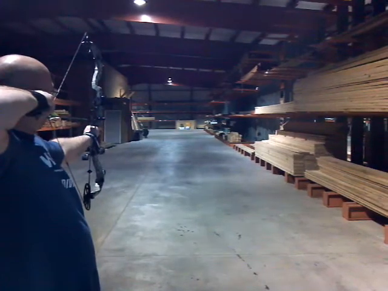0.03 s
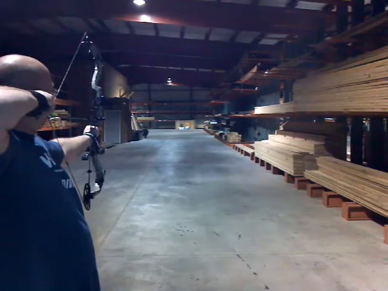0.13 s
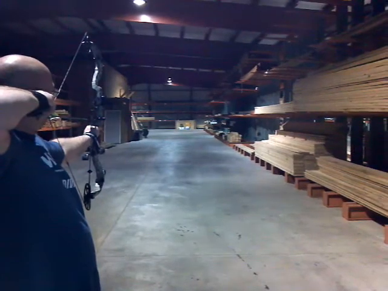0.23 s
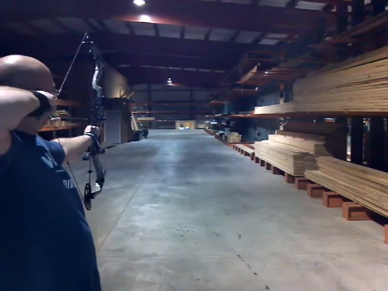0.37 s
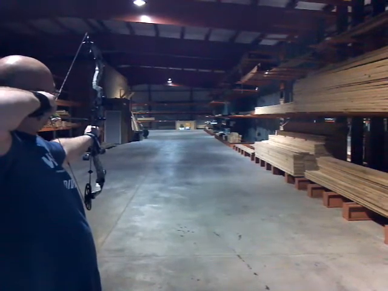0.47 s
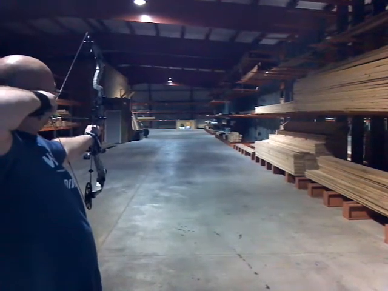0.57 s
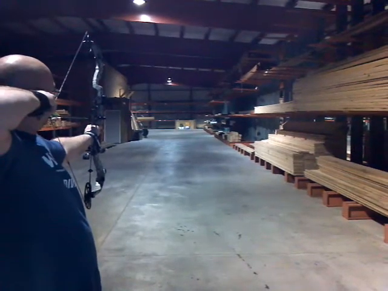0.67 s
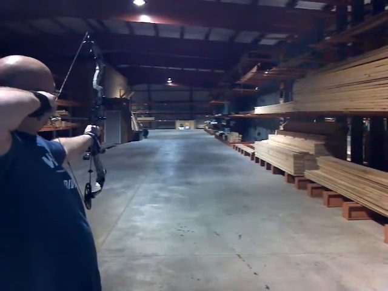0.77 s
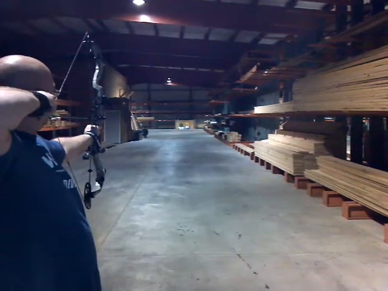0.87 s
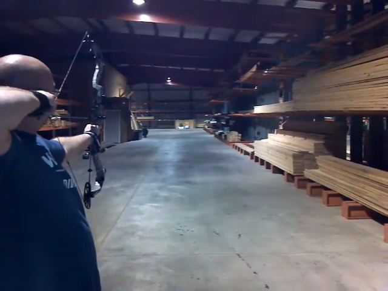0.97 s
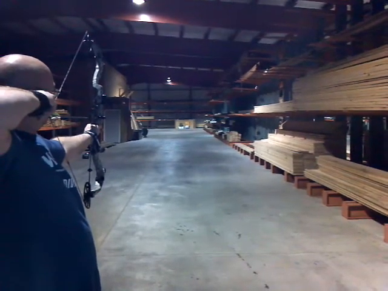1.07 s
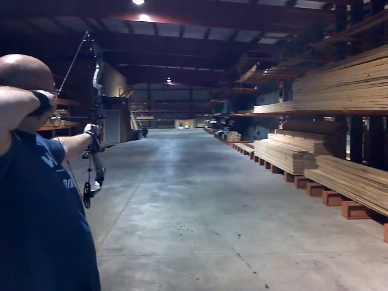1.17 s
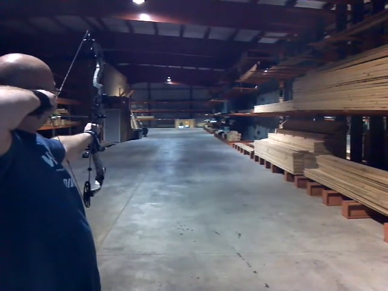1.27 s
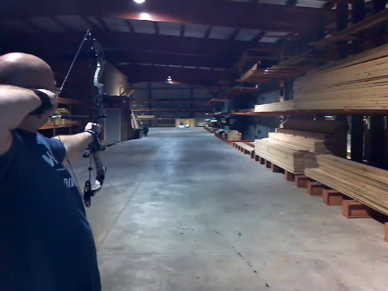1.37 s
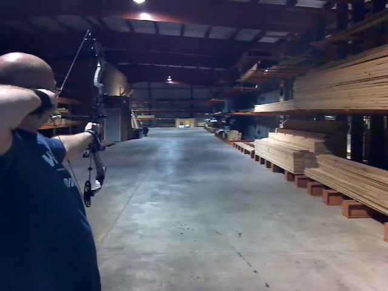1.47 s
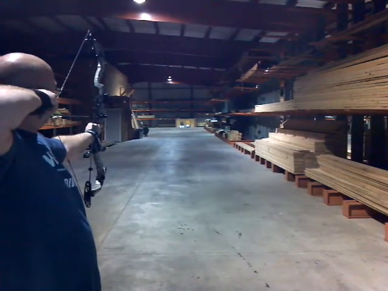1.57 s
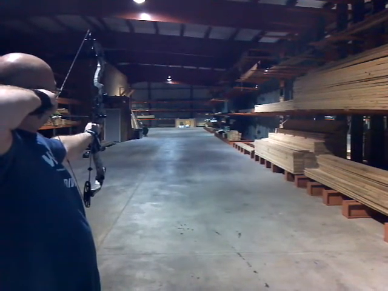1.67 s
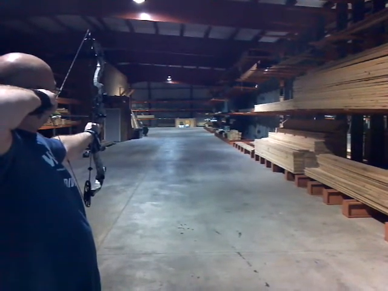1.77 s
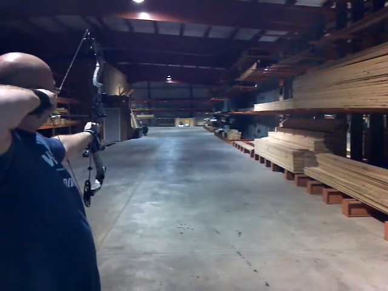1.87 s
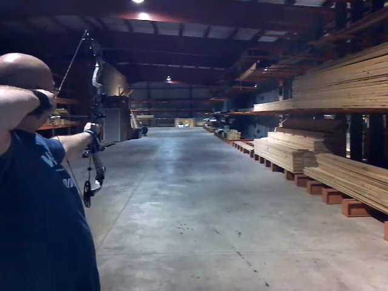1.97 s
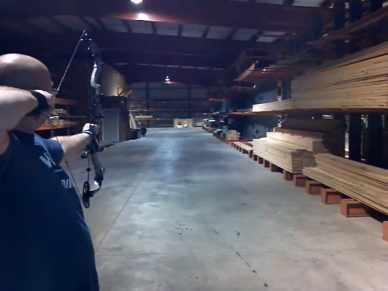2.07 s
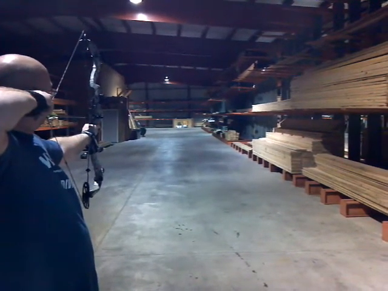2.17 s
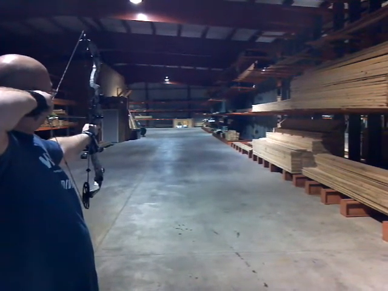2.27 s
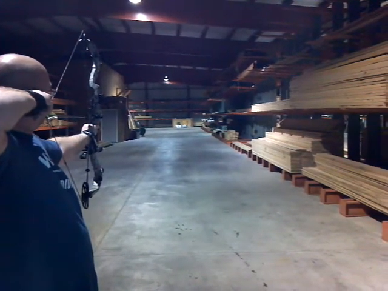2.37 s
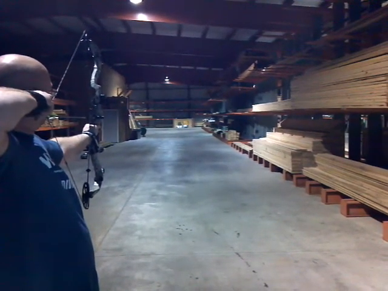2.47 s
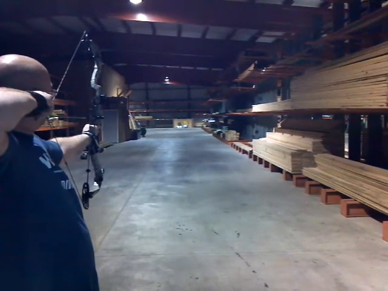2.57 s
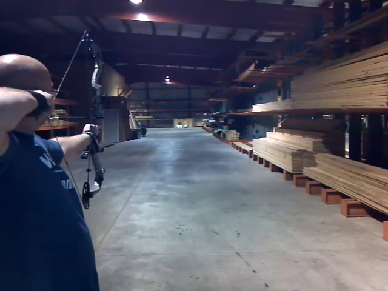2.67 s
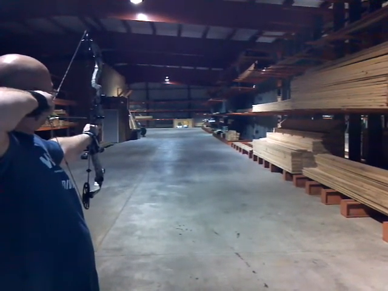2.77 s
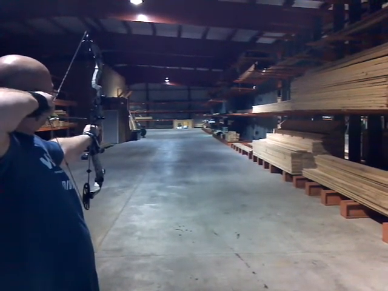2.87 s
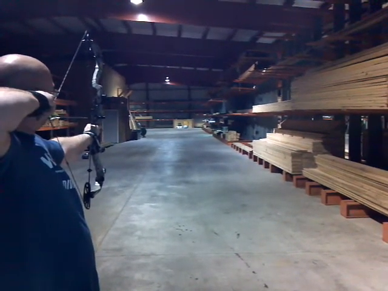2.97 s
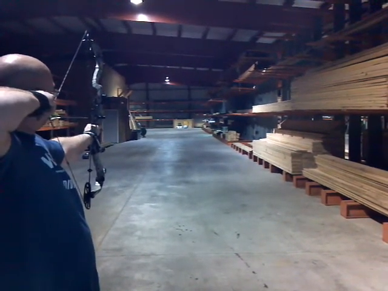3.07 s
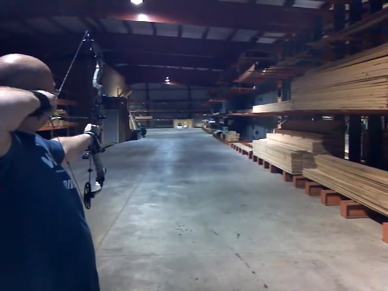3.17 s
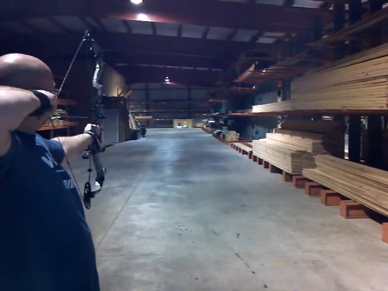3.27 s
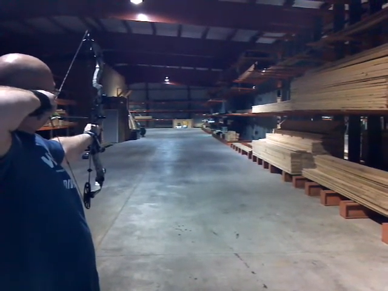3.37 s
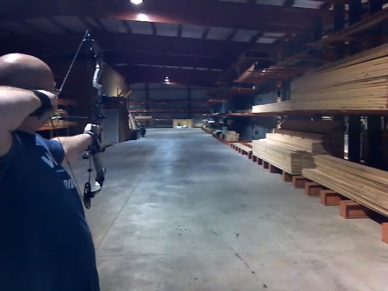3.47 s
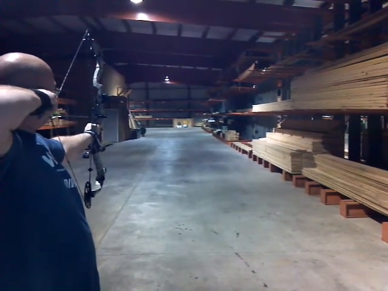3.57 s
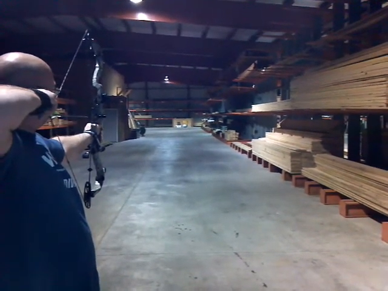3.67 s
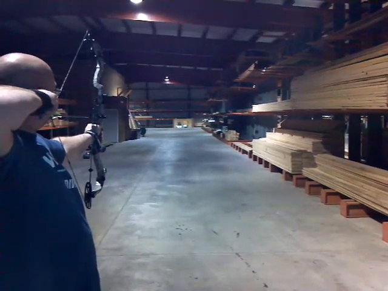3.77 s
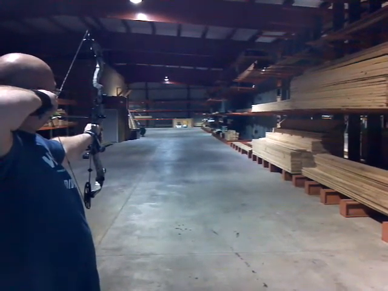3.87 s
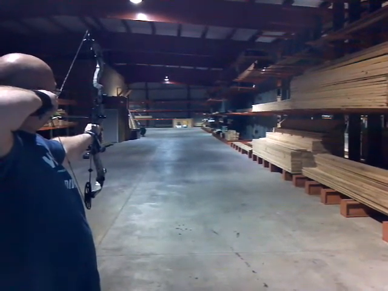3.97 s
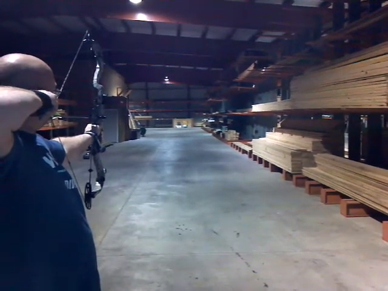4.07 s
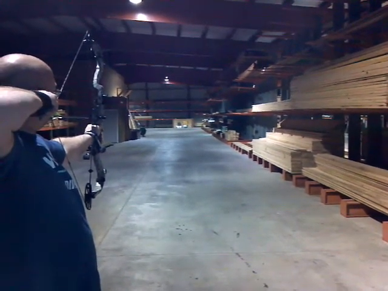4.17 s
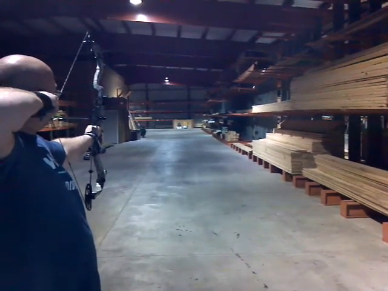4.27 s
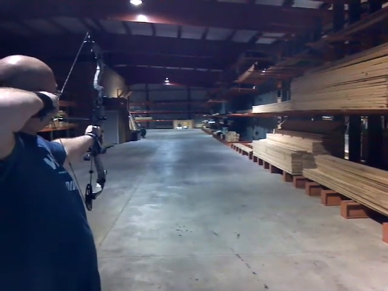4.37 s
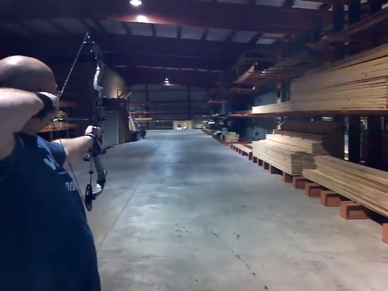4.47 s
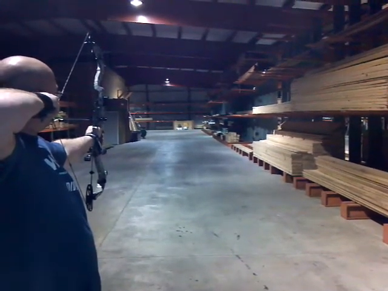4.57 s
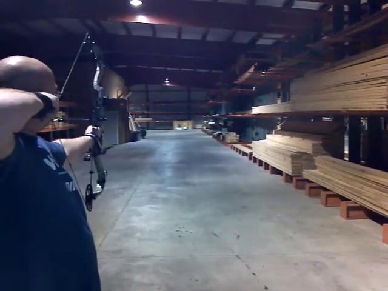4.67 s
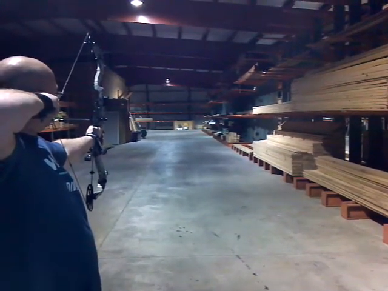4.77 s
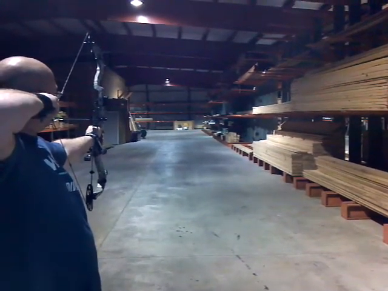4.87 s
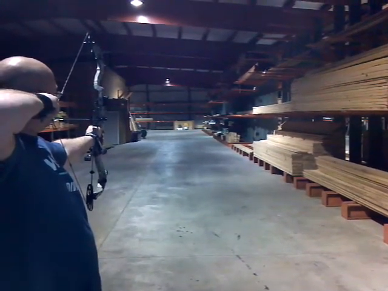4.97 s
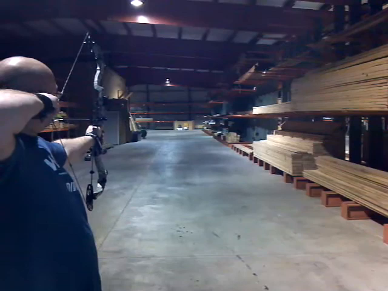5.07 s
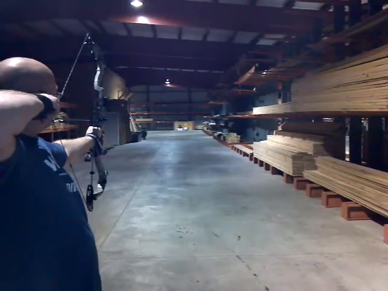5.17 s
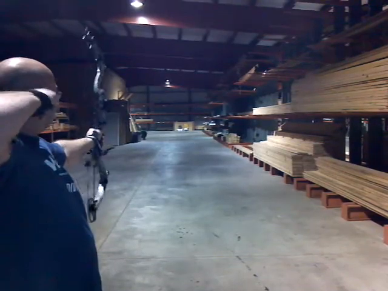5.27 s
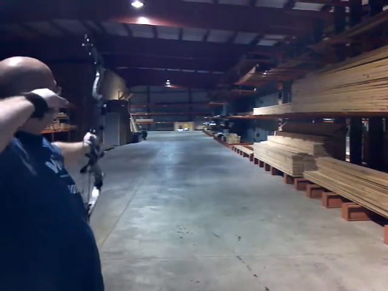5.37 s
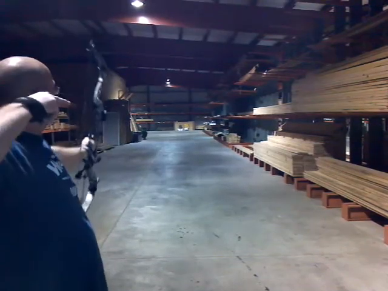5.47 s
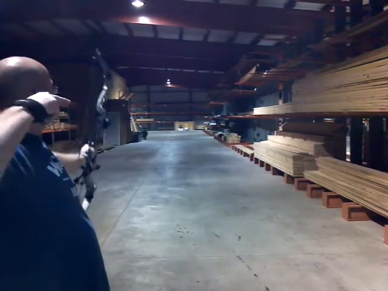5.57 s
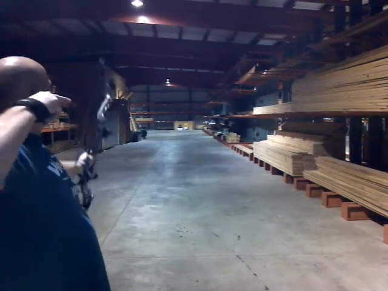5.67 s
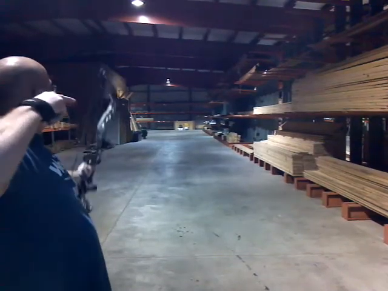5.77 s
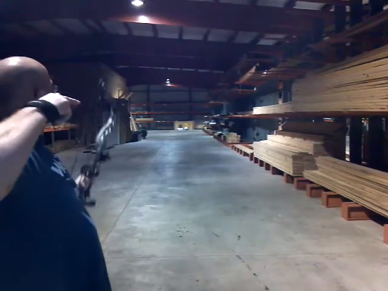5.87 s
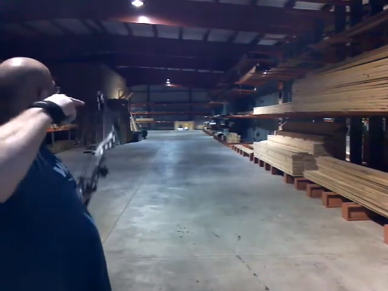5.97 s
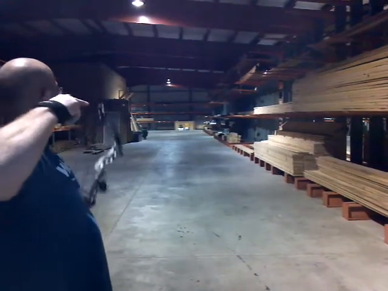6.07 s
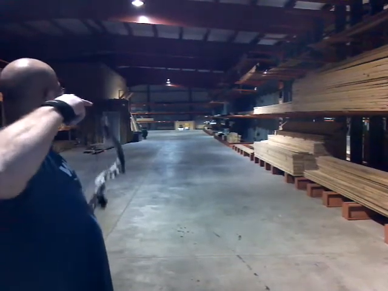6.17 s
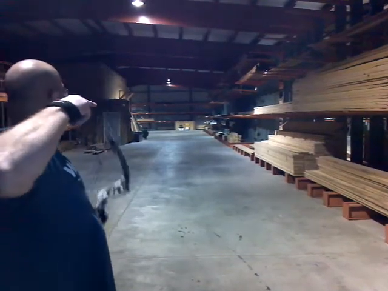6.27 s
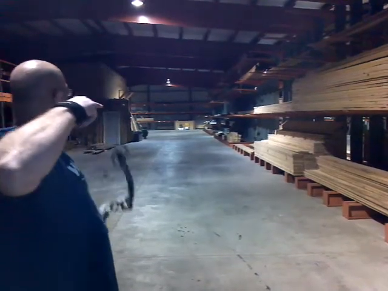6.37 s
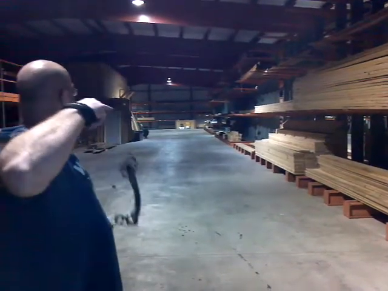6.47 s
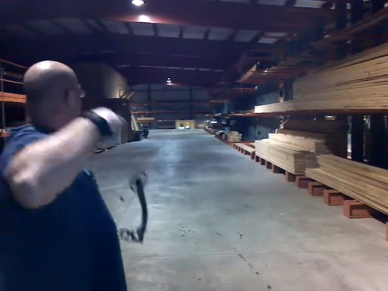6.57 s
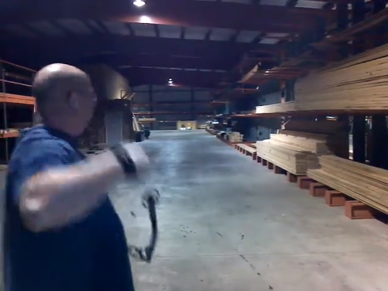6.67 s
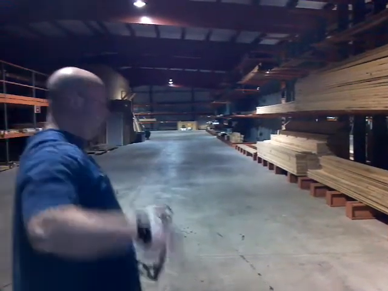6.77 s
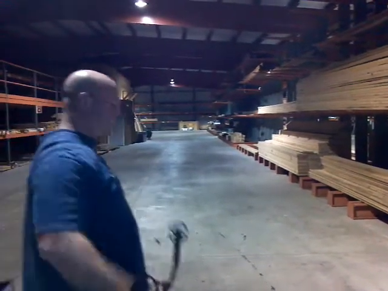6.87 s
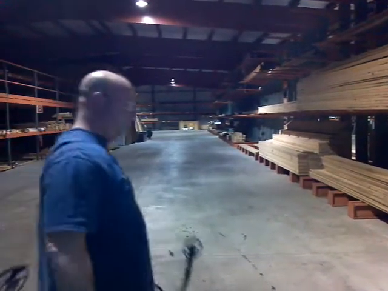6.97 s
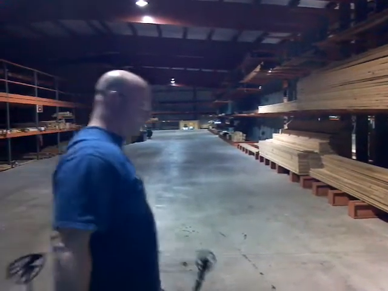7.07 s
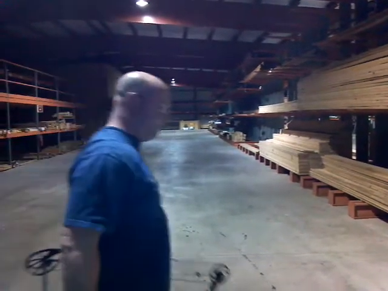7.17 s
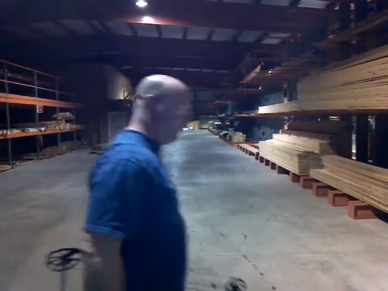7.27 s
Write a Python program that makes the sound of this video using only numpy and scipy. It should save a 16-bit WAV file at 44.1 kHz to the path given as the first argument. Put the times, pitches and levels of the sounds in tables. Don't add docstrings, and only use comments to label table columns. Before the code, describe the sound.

Quiet lamp hum and hiss, then a trigger click and hard bowstring crack; under a second later an arrow thuds far away, both echoing.

```python
import sys
import numpy as np
from scipy import signal
from scipy.fft import rfft, irfft
from scipy.io import wavfile
from scipy.ndimage import uniform_filter1d

SR = 44100
rng = np.random.default_rng(int(sys.argv[2]) if len(sys.argv) > 2 else 0)


def output_pcm(signal):
    pcm = np.clip(np.atleast_2d(signal).T, -1, 1) * 32767
    wavfile.write(sys.argv[1], SR, np.round(pcm).astype(np.int16))


def level_to_linear(level):
    exponent = np.asarray(level, float) / 20
    return 10 ** exponent


N = 322582

# frequency in Hz, side minus mid level in dB.
SPREAD = [(40, -32), (80, -26), (170, -22.5), (330, -12.5), (670, -5), (1300, -3), (2000, 1), (15000, 0)]


def read(points, hz):
    f, value = np.transpose(points)
    return np.interp(np.log(hz + 1), np.log(f + 1), value)


def add(mix, start_s, sound):
    part = mix[..., round(start_s * SR):][..., :sound.shape[-1]]
    part += sound[..., :part.shape[-1]]


def colour(points):
    log_gain = np.log(level_to_linear(read(points, abs(np.fft.fftfreq(4096, 1 / SR)))))
    minimum_phase = np.exp(np.conj(signal.hilbert(log_gain)))
    return np.fft.ifft(minimum_phase).real[:2048]


def ring(modes):
    t = np.arange(SR * 3 // 4) / SR
    sines = [level_to_linear(db - 60 * t / t60_s) * np.sin(2 * np.pi * hz * t) for hz, db, t60_s in modes]
    return sum(sines) / 2


def burst(length_s):
    t = np.arange(SR // 30) / SR
    attack = np.minimum(t / 0.00014, 1)
    shape = np.exp(-t / length_s) * attack
    puff = rng.standard_normal(len(t)) * shape
    return puff * np.linalg.norm(shape) / np.linalg.norm(puff)


def diffuse(field_db, spread, start_s=0, size=512, patchy_db=1.5):
    first = round(start_s * SR)
    hz, t, z = signal.stft(rng.standard_normal((2, N - first)), SR, nperseg=size)
    patches = uniform_filter1d(rng.standard_normal(z.shape[1:]), 5, 0)
    patches = uniform_filter1d(patches, 9, 1)
    level_db = field_db(hz[:, None], t + start_s) + patchy_db * patches / patches.std()
    z = z * level_to_linear(level_db) * np.sqrt(SR / 2)
    z[1] *= level_to_linear(read(spread, hz))[:, None]
    mid, side = signal.istft(z, SR, nperseg=size)[1][:, :N - first]
    return np.pad([mid + side, mid - side], ((0, 0), (first, 0)))


def arrive(x, late):
    hz = np.fft.rfftfreq(N, 1 / SR)
    delay = np.exp(-2j * np.pi * hz * read(late, hz) / SR)
    return np.array([x, irfft(rfft(x) * delay, N)])


def curve(t, top_s, rise_s, fall_s):
    return (t - top_s) / np.where(t < top_s, rise_s, fall_s)


def bow():
    # start in seconds, crack level in dB, blow into the limbs in dB, crack length in seconds.
    snaps = [
        (5.2718, -31, -60, 0.0024),
        (5.2744, -13, -56, 0.0014),
        (5.281, -28.5, -56, 0.005),
        (5.293, -28, -41, 0.0043),
        (5.337, -31, -28, .003),
    ]
    # frequency in Hz, level in dB.
    crack_colour = [(300, -21.5), (1000, -17.5), (2100, -10), (3400, -9), (4600, -15), (6800, -1),
                    (8500, -2), (10700, -11), (14200, -11), (16200, -28), (16800, -59)]
    # frequency in Hz, level in dB, t60 in seconds.
    limb_modes = [(170.6, -13, 0.12), (380, 4, 0.03), (702, -18, 0.037), (790, -5.5, 0.092),
                  (834, -5.5, 0.043), (940, -8, 0.032), (1120, -4.5, 0.04), (1255, -11, 0.077),
                  (3350, -3, 0.035), (3630, -11, 0.06), (5880, -8, .08), (6560, -7, 0.054)]
    # start in seconds, frequency in Hz, level in dB, t60 in seconds.
    riser_modes = [
        (5.2967, 362, -15.5, 0.22),
        (5.2965, 395, -18.5, 0.092),
    ]
    crack, blow = np.zeros((2, N))
    for start_s, crack_db, blow_db, length_s in sorted(snaps + string_slaps()):
        add(crack, start_s, level_to_linear(crack_db) * burst(length_s))
        add(blow, start_s, level_to_linear(blow_db) * signal.windows.hann(9) / 4)
    out = signal.oaconvolve(crack, colour(crack_colour))[:N]
    out += signal.oaconvolve(blow, ring(limb_modes))[:N]
    for start_s, *mode in riser_modes:
        swing = ring([mode])
        onset = np.minimum(np.arange(len(swing)) / SR / 0.0085, 1)
        add(out, start_s, 2 * swing * onset)
    return out


def string_slaps():
    slaps = 6
    k = np.arange(slaps)
    start_s = 5.2961 + 0.0042 * k + 0.00002 * k ** 3 * (k / slaps) ** 2
    crack_db = -4.5 - 3.3 * k
    blow_db = -17 - 0.8 * (k - 2.2) ** 2
    length_s = 0.0008 * 1.25 ** k
    return list(zip(start_s, crack_db, blow_db, length_s))


def target():
    # start in seconds, thump level in dB, slap level in dB, polarity.
    thumps = [
        (6.1422, -20, -23, 1),
        (6.1505, -30, -24, 1),
        (6.1533, -5, -34, -1),
        (6.1609, -19.5, -25, -1),
        (6.174, -20, -24, 1),
        (6.1859, -9.5, -27, -1),
        (6.194, -21, -33, -1),
        (6.208, -20, -30, -1),
        (6.284, -25, -55, -1),
    ]
    # frequency in Hz, level in dB,
    # t60 in seconds.
    bag_modes = [(167, -1, .09), (206, -8, 0.1), (298, 2.5, 0.06), (353, -5.5, 0.04), (737, -9, 0.043),
                 (720, -33, 1.3), (820, -9, .04), (1250, -22, 0.14), (1900, -15, .14)]
    # frequency in Hz, level in dB.
    slap_colour = [(300, -21.5), (800, 0.5), (2000, 3.5), (3500, -25), (6500, -7.5), (10000, -17),
                   (14500, -36), (15800, -60)]
    slap, blow = np.zeros((2, N))
    for start_s, thump_db, slap_db, polarity in thumps:
        add(slap, start_s, level_to_linear(slap_db) * burst(0.0046))
        add(blow, start_s, polarity * level_to_linear(thump_db) * signal.windows.hann(41) / 20)
    out = signal.oaconvolve(slap, colour(slap_colour))[:N]
    return out + signal.oaconvolve(blow, ring(bag_modes))[:N]


def ticks():
    # start in seconds, peak level in dB, frequency in Hz.
    clicks = [(5.5585, -32, 6200), (5.6114, -50, 6740), (5.6194, -49, 6120), (5.8097, -45, 6900),
              (6.4814, -53.5, 6910), (6.8237, -37, 6500), (6.8646, -36, 6610)]
    # start in seconds, peak level in dB, frequency in Hz.
    knocks = [
        (1.372, -62, 15600),
        (7.2148, -50, 3200),
    ]
    out, t = np.zeros(N), np.arange(400) / SR
    for start_s, peak_db, hz in clicks + knocks:
        metal = np.sin(2 * np.pi * hz * t) * np.exp(-t / 0.00025)
        puff = burst(0.0004)[:400]
        add(out, start_s, level_to_linear(peak_db - 7) * (np.convolve(metal, puff)[:400] + 0.8 * puff))
    return out


def end_walls(x):
    # delay in seconds, level in dB.
    bounces = [
        (0.3815, -20.5),
        (.764, -36.5),
    ]
    # frequency in Hz, level in dB.
    wall_colour = [(100, -12), (200, -9), (310, -3), (450, -5), (850, -14), (1200, -3), (2500, -8),
                   (6000, -45)]
    smear_s, centre = 0.016, 500
    scatter = 0.09 * rng.standard_normal(1500)
    scatter *= signal.windows.exponential(1500, centre, smear_s * SR, sym=False)
    scatter[centre] = 1
    dull = signal.oaconvolve(x, np.convolve(scatter, colour(wall_colour)))[centre:N + centre]
    out = np.zeros(N)
    for delay_s, db in bounces:
        add(out, delay_s, level_to_linear(db) * dull)
    return out


def hall(start_db, t60, start_s, fill_s, tail_db, early_db, early_s):
    def field_db(hz, t):
        return read(start_db, hz) - 60 * np.maximum(t - start_s, 0) / read(t60, hz)

    since_s = np.maximum(np.arange(N) / SR - start_s, 0)
    fill = np.minimum(since_s / fill_s, 1) ** 1.3
    level = level_to_linear(tail_db + early_db * np.exp(-since_s / early_s))
    return diffuse(field_db, SPREAD, start_s, patchy_db=0.5) * fill * level


def bow_tail():
    # frequency in Hz, level in dB per Hz.
    bow_hall = [(60, -71), (120, -59), (250, -69.5), (365, -53), (520, -70.5), (900, -77), (2500, -78.5),
                (5000, -79.5), (8000, -84.5), (10700, -92.5), (14500, -92), (16000, -99), (16500, -130)]
    # frequency in Hz, t60 in seconds.
    bow_t60 = [(100, 3), (350, 0.97), (1000, 1.17), (3000, 1.24), (6000, 1.0), (10000, 0.8), (15000, 0.55)]
    bow_fill = (5.294, .013, -2.5, 16, .055)
    return hall(bow_hall, bow_t60, *bow_fill)


def target_tail():
    # frequency in Hz, level in dB per Hz.
    target_hall = [(70, -72.5), (120, -36), (170, -46), (330, -59.5), (560, -80), (740, -69), (1300, -71),
                   (2100, -66.5), (3700, -72.5), (5100, -85), (7800, -89), (11000, -107), (15000, -112),
                   (16000, -130)]
    # frequency in Hz, t60 in seconds.
    target_t60 = [(100, 1.2), (350, 1.5), (1000, 1.1), (3300, 1.5), (6000, 1.05), (10000, 0.5), (15000, .3)]
    target_fill = (6.142, .032, 1.5, 4, .045)
    return hall(target_hall, target_t60, *target_fill)


def sleeve():
    # frequency in Hz, level in dB per Hz.
    cloth_colour = [(1000, -112), (2000, -110), (4200, -118), (6500, -107), (8200, -113), (10000, -120),
                    (13000, -118), (15100, -122), (15600, -160)]

    def field_db(hz, t):
        return read(cloth_colour, hz) + 3.5 - 6 * curve(t, top_s=7.08, rise_s=0.19, fall_s=0.15) ** 2

    return diffuse(field_db, SPREAD, start_s=6.75, patchy_db=2.5)


def passing_vehicle():
    # frequency in Hz, level in dB per Hz.
    passing_colour = [(90, -100), (140, -81.5), (220, -85.5), (330, -100), (500, -120), (1000, -160)]

    def field_db(hz, t):
        distance = curve(t, top_s=5.15, rise_s=0.3, fall_s=0.6)
        return read(passing_colour, hz) + 3 - 10 * np.log10(1 + distance ** 4)

    return diffuse(field_db, SPREAD, start_s=4, size=2048, patchy_db=0.5)


def tones(orders, base_hz, waver_db):
    t, out = np.arange(N) / SR, np.zeros(N)
    slow_t = t[::256]
    for order, db in orders:
        a, b, c, phase = rng.random(4)
        drift = np.sin(2 * np.pi * ((0.24 + 0.5 * a) * slow_t + b))
        drift += np.sin(2 * np.pi * (0.79 * slow_t * (1 + c) + a))
        level = np.interp(t, slow_t, level_to_linear(db + waver_db * drift))
        out += np.sqrt(2) * level * np.sin(2 * np.pi * (order * base_hz * t + phase))
    return out


def lamp_hum():
    # multiple of twice the mains, level in dB.
    lamp_orders = [(1, -61), (2, -72.5), (3, -82), (4, -89), (5, -83), (6, -88.5), (7, -92), (9, -97),
                   (10, -98.5), (11, -91), (12, -95), (33, -99), (50, -100), (51, -91.5), (52, -93.5),
                   (55, -90), (57, -89), (58, -103)]
    buzz = tones(lamp_orders, base_hz=120.05, waver_db=1.2)
    return arrive(buzz, [(1, -5)]) * level_to_linear([[-0.15], [0.15]])


def fan():
    # multiple of the blade rate, level in dB.
    fan_orders = [(1, -89), (2, -82), (3, -83.5), (4, -86.5), (5, -90), (10, -94.5)]
    return tones(fan_orders, base_hz=92.9, waver_db=0) * np.array([[0.7], [-1.3]])


def hall_air():
    # frequency in Hz, level in dB per Hz.
    air_colour = [(50, -97), (85, -87), (130, -76.5), (240, -88.5), (400, -98.5), (800, -111), (1500, -117),
                  (4000, -122), (9000, -140)]

    def field_db(hz, t):
        rise_db = 5 / (1 + np.exp((5.3 - t) / 0.3))
        return read(air_colour, hz) - 6 + rise_db

    return diffuse(field_db, SPREAD, size=2048, patchy_db=1.3)


def capsule_hiss():
    # frequency in Hz, level in dB per Hz.
    hiss_colour = [(40, -118), (120, -103), (300, -99), (600, -107), (1300, -112), (3000, -115),
                   (6500, -116), (8000, -117), (15150, -116), (15600, -160)]
    return diffuse(lambda hz, t: read(hiss_colour, hz), [(1, 0), (2, 0.0042)], patchy_db=1.4)


def scene():
    # frequency in Hz, lateness of the right capsule in samples.
    around = [(1000, 5), (1700, 10), (3300, 11), (4300, 13)]
    shot, hit = bow(), target()
    near = arrive(shot + ticks(), around)
    far = arrive(hit + end_walls(hit + level_to_linear(-18) * shot), [(1, -1)])
    wind_filter = signal.butter(3, 135, "high", fs=SR, output="sos")
    blows = signal.sosfilt(wind_filter, near + far + bow_tail() + target_tail())
    return blows + sleeve() + passing_vehicle() + lamp_hum() + fan() + hall_air()


def band_limit(x):
    return signal.sosfilt(signal.butter(12, 16480, fs=SR, output="sos"), x)


def record(dry):
    # frequency in Hz, left minus right level in dB.
    mismatch = [(80, -.8), (400, -1), (1000, 0), (3500, 0), (5500, 9), (7500, 10), (10500, 4), (15000, 3)]
    lean = level_to_linear(read(mismatch, np.fft.rfftfreq(N, 1 / SR)) / 2)
    capsules = irfft(rfft(dry) * np.array([lean, 1 / lean]), N)
    capsules = capsules + capsule_hiss()
    cross_samples = 17
    wide = capsules - np.roll(capsules[::-1], cross_samples, axis=1)
    return band_limit(wide)


dry = scene()
out = record(dry)
output_pcm(out)
```